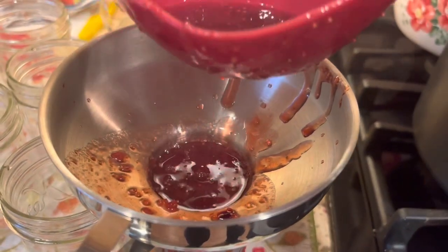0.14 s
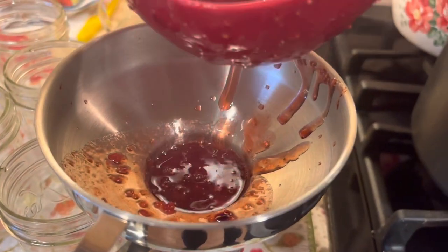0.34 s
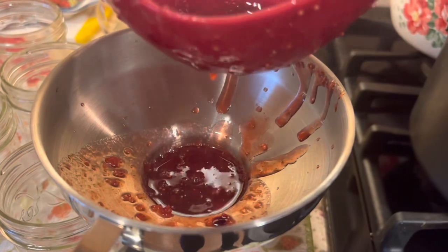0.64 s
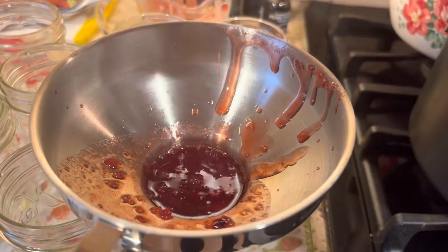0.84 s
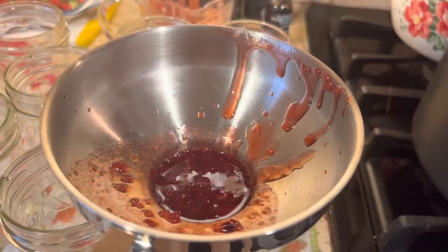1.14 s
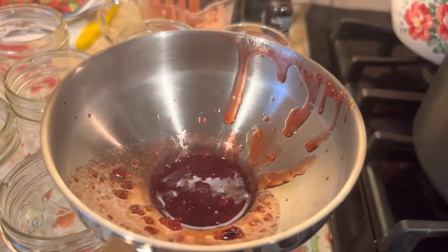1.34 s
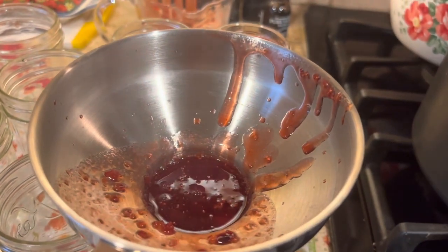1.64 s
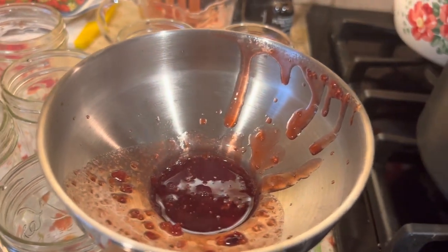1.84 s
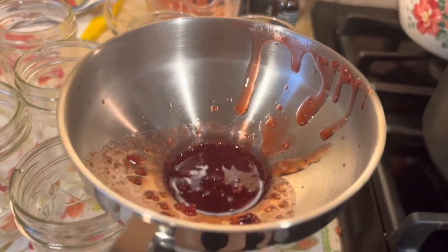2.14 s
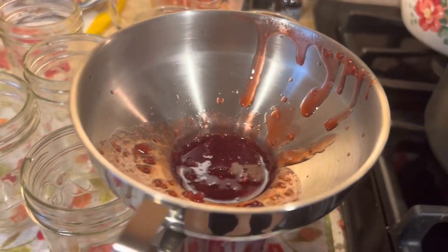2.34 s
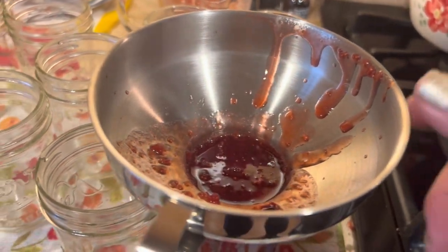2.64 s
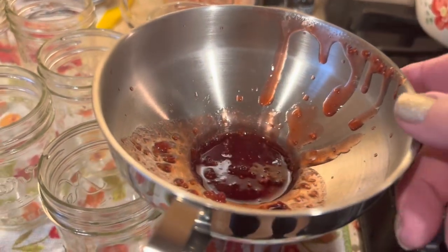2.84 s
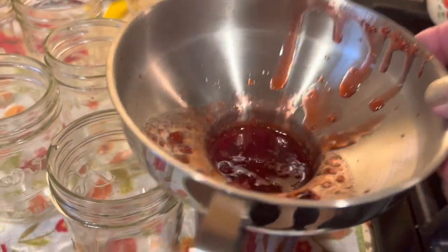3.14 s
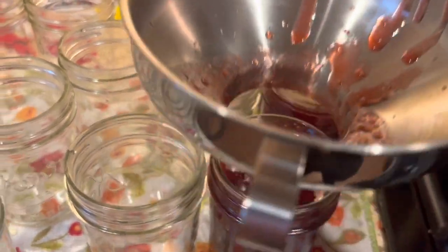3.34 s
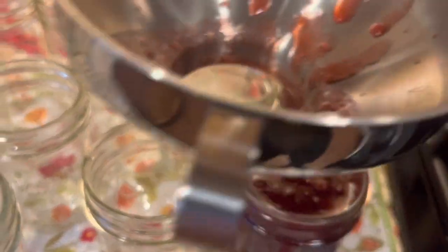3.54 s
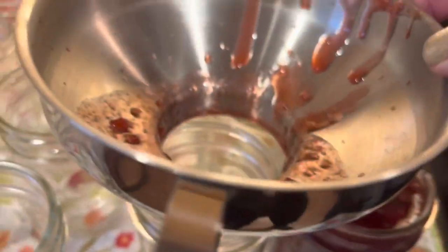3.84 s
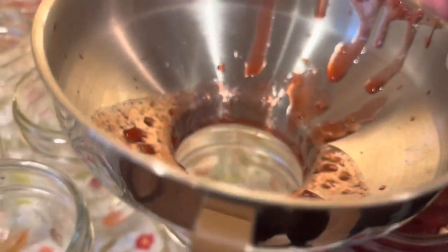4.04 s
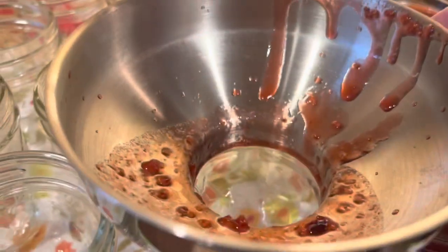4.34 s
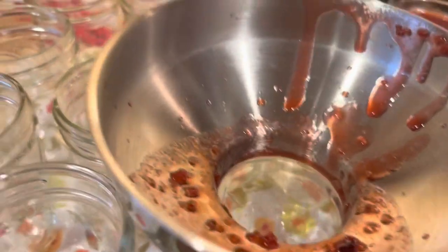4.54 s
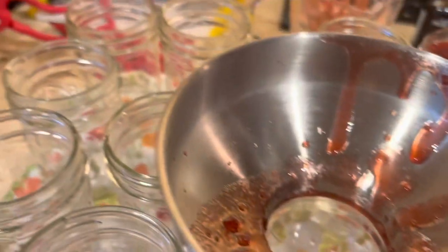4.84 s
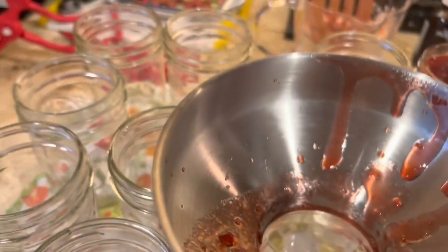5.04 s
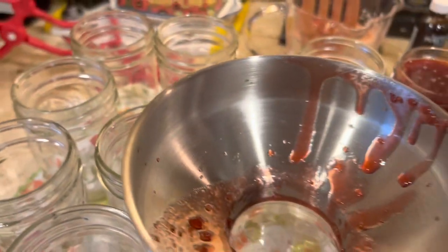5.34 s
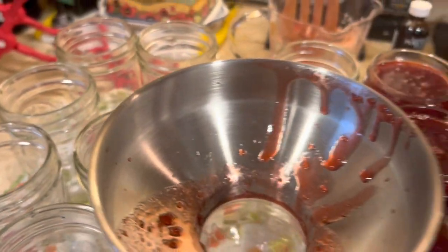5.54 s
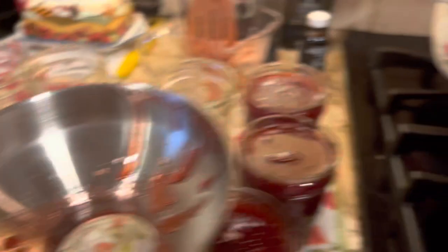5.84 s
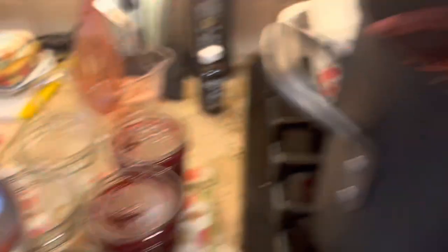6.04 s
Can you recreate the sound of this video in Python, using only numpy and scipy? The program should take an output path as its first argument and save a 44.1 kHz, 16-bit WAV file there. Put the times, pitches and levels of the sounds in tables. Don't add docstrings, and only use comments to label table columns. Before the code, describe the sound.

A steady low extractor fan rumbles with faint hiss in a small hard kitchen. A ladle is set in a pot with a cluster of hollow knocks. After a pause, a steel funnel squeaks and rattles very softly off a full jar, then hits an empty glass jar in three sharp clanks, the last loudest. Soft rubs on the counter and one small pot knock follow, heard close in stereo.

```python
import sys
import numpy as np
from scipy import signal
from scipy.fft import rfft, irfft
from scipy.io import wavfile
from scipy.ndimage import uniform_filter1d

SR = 44100
rng = np.random.default_rng(int(sys.argv[2]) if len(sys.argv) > 2 else 0)


def amplitude_ratio(level_db):
    exponent = np.asarray(level_db, float) / 20
    return 10 ** exponent


def waveform_to_disk(signal):
    frames = np.transpose(np.atleast_2d(signal))
    scaled = np.clip(frames, -1, 1) * 32767
    samples = np.round(scaled).astype(np.int16)
    wavfile.write(sys.argv[1], SR, samples)


N = 272979
SPAN = 1 << 15

# frequency [Hz], density [dB per Hz].
STEEL_CLATTER = [(71, -35.5), (120, -8.5), (598, 1), (2280, -9.5), (2750, 1), (3740, -6), (4600, -16.5),
                 (5770, -3), (6950, -14), (8530, -12), (10300, -21.5), (11900, -21), (13700, -35),
                 (15200, -17), (16500, -34.5)]
# frequency [Hz], level [dB], t60 [s].
COUNTER = [(405, 4, 0.07), (1100, 3, 0.035), (1552, -3.5, 0.053), (1890, -9.5, 0.039), (2290, -12, 0.045),
           (3040, -4, 0.047), (3570, -16, .04), (4250, -16.5, 0.033), (4790, -10, .04), (7180, -13, 0.034)]
# frequency [Hz], level [dB], t60 [s].
FUNNEL_TILTED = [(501, -7.5, 0.05), (2784, -0.5, 0.11), (3256, -1, 0.05), (3776, -9.5, 0.099),
                 (6230, -29.5, 0.18), (7394, -16, 0.1), (8770, -16.5, 0.069), (9600, -32, 0.13),
                 (11000, -32.5, 0.12), (15300, -27, 0.057)]

LIFT_S, LIFT_DB = 3.176, -54.5


def read(table, hz):
    f, v = np.transpose(table)
    return np.interp(np.log(np.maximum(hz, 1)), np.log(f), v)


def unit(x):
    return x / np.sqrt(np.mean(x ** 2))


def walk(rate_hz):
    k = int(SR / rate_hz)
    held = np.repeat(rng.standard_normal(N // k + 1), k)
    return uniform_filter1d(uniform_filter1d(held, k), k)[:N]


def ring(hz, t60_s, start_s=0):
    t = np.arange(SPAN) / SR
    decay = np.exp(-np.log(1000) * t / np.maximum(t60_s, .005))
    return np.sin(2 * np.pi * hz * (t + start_s)) * decay


def add(track, s, sound):
    i = int(s * SR)
    track[i:i + SPAN] += sound[:len(track) - i]


def causal(db):
    cep = irfft(db * np.log(10) / 20)
    cep[1:SPAN // 2] *= 2
    cep[SPAN // 2 + 1:] = 0
    return np.exp(rfft(cep))


def strikes(contacts, clatter, modes, ring_db, grit_db, longest_s, swell=0):
    out, t, hz = np.zeros(N), np.arange(SPAN) / SR, np.fft.rfftfreq(SPAN, 1 / SR)
    dry = causal(read(clatter, hz))
    body = rfft(sum(amplitude_ratio(db) * ring(f, min(t60_s, longest_s)) for f, db, t60_s in modes))
    flutter = amplitude_ratio(4.5 * walk(120)[:SPAN])
    for s, peak_db, bass_db, treble_db, length_s, share_db in contacts:
        x = t / max(length_s, 3e-4)
        envelope = x ** swell * np.exp(-x)
        noise, grit = rng.standard_normal((2, SPAN))
        burst = rfft(envelope * noise * amplitude_ratio(grit_db * grit))
        burst *= causal(read([(300, bass_db), (2500, 0.0026), (10000, treble_db)], hz))
        crack = irfft(burst * dry)
        tone = irfft(burst * body) * flutter
        sound = crack / abs(crack).max() + amplitude_ratio(ring_db + share_db) * tone / abs(tone).max()
        add(out, s, amplitude_ratio(peak_db) * sound)
    return out


def fan_air():
    # frequency [Hz], density [dB per Hz].
    rumble = [(29, -24), (41, -26), (52, -2.5), (65, -9), (114, -13), (145, -11.5), (169, -25),
              (226, -18.5), (359, -20.5), (391, -23), (699, -23.5), (775, -34), (844, -31), (3000, -57.5),
              (3900, -89), (6600, -120)]
    # frequency [Hz], density [dB per Hz].
    hiss = [(1500, -9), (3000, -2), (5000, -1), (7500, -2), (9200, -7), (10300, -18.5), (11300, -4.5),
            (12500, -8), (13500, -17), (16000, -25)]
    # frequency [Hz], likeness [-1 to 1].
    likeness = [(60, 1), (130, 0.88), (290, 0.83), (640, -0.097), (1410, 0.04), (3100, -0.024),
                (6820, 0.35), (15000, -0.19)]
    # frequency [Hz], difference [dB].
    left_right = [(60, 3.5), (110, 4), (200, 2), (700, -1), (1290, 2), (8120, 4.5), (15000, -1.5)]
    # frequency [Hz], width [Hz], level [dB].
    duct = [(56.4, 23, -53.5), (130, 56, -63.5), (304.5, 13, -70), (379, 40, -69.5), (427, 13, -71.5),
            (3300, 380, -92)]
    hz = np.fft.rfftfreq(N, 1 / SR)
    alike = np.clip(read(likeness, hz), -.99, .99)
    balance = amplitude_ratio(read(left_right, hz) / 2)

    def stereo(shape):
        mid, side = rfft(rng.standard_normal((2, N))) * np.sqrt([1 + alike, 1 - alike])
        return unit(irfft(shape * np.array([(mid + side) * balance, (mid - side) / balance]), N))

    out = amplitude_ratio(-53.5 + .8 * walk(1.9)) * stereo(amplitude_ratio(read(rumble, hz)))
    out += amplitude_ratio(-87) * stereo(amplitude_ratio(read(hiss, hz)))
    for f, width_hz, db in duct:
        out += amplitude_ratio(db + 0.89 * walk(5.3)) * stereo(1 / (1 + (2 * (hz - f) / width_hz) ** 2))
    return out


def counter_ticks():
    # start [s], peak [dB], bass [dB], treble [dB], contact length [s].
    ticks = [
        (0.783, -66, -24, 1, .002),
        (1.163, -56.5, -36, 19, .002),
        (1.871, -34.5, -12, 11, 0.0056),
        (4.696, -68, -32, 30, .004),
    ]
    contacts = [(*row, 0) for row in ticks]
    return strikes(contacts, STEEL_CLATTER, COUNTER, ring_db=-8, grit_db=2.5, longest_s=0.092)


def ladle_in_pot():
    # start [s], peak [dB], bass [dB], treble [dB], contact length [s].
    blows = [(1.552, -36.5, 14, -1, 0.018), (1.573, -44.5, -5.5, -4, 0.071),
             (1.617, -24.5, -2.5, -11.5, 0.0053), (1.623, -30.5, 1, -18, 0.0085),
             (1.667, -34.5, -27, -6, 0.0077), (1.689, -49, 1, -6, .066), (1.819, -33, 14, 1.5, 0.031),
             (1.882, -28.5, 9, 5, 0.02), (1.906, -34, 14, 0, .008), (1.93, -46, 12, 7, 0.055),
             (6.068, -37, -4, -16, 0.0073)]
    # frequency [Hz], density [dB per Hz].
    clatter = [(60, -39.5), (100, -10), (185, 0.5), (300, -5), (433, -10), (600, -10.5), (1150, -9),
               (2470, -23), (7000, -34), (9300, -47.5), (10500, -62), (16000, -83.5)]
    # frequency [Hz], level [dB], t60 [s].
    pot = [(141.5, 0, 0.3), (179.9, 7.5, 0.16), (200, -13, 0.12), (240, -5.5, .2), (310.6, -7, 0.19),
           (400, 2.5, 0.13), (445, -5, 0.16), (790, -13, .1), (1100, -13.5, 0.11), (1350, -1, 0.043),
           (1810, -17, 0.063), (2252, -51, 0.057), (7300, -44, .06)]
    contacts = [(*row, min(-2 + 0.54 * row[2], -0.5)) for row in blows]
    return strikes(contacts, clatter, pot, ring_db=-0.5, grit_db=1.5, longest_s=0.3)


def pot_notes():
    # start [s], peak [dB], frequency [Hz].
    thuds = [(1.555, -21.5, 440), (1.556, -35, 240), (1.579, -16, 180.7), (1.622, -22, 445),
             (1.622, -19, 1105), (1.63, -41, 200), (1.65, -39, 438.5), (1.683, -31.5, 180),
             (1.722, -40.5, 200), (1.819, -28, 440), (1.828, -41, 235), (1.874, -26.5, 200),
             (1.882, -23, 440), (1.883, -36, 1100), (1.905, -27, 412), (1.902, -25, 200),
             (1.907, -35.5, 1092), (4.431, -37, 400), (5.2, -42.5, 149.8), (6.069, -34, 404.8),
             (6.069, -42, 1150)]
    result = []
    for s, db, hz in thuds:
        t60_s = 0.1 * amplitude_ratio(-0.56 * (db + 26.5)) * (200 / hz) ** 0.6
        rise_s = 1.1 / hz + .0008
        result.append((s, db, hz, t60_s, rise_s))
    return result


def finger_squeak():
    # start [s], peak [dB].
    grips = [
        (2.797, -52.5),
        (2.815, -51),
        (2.834, -67),
    ]
    # frequency [Hz], density [dB per Hz].
    squeak = [(880, -57), (1500, -22), (1760, -9), (2380, -22), (2680, -7), (2970, -26), (4300, -8),
              (4660, -21), (5810, -19), (10700, -44), (11200, -13), (12000, 2), (13500, -26), (15900, -13),
              (16500, -45)]
    contacts = [(*row, -12, 1, .006, 0) for row in grips]
    return strikes(contacts, squeak, FUNNEL_TILTED, ring_db=-11.5, grit_db=10.5, longest_s=.12, swell=1.96)


def bounces(count):
    first_s, gap_s, shrink = 3.216, .030, .83
    k = np.arange(count)
    return zip(k, first_s + gap_s * (1 - shrink ** k) / (1 - shrink), -47 - 2.5 * k)


def funnel_rattle():
    # start [s], peak [dB].
    fingers = [
        (2.936, -57.5),
        (3.002, -63),
        (3.027, -57),
    ]
    # frequency [Hz], density [dB per Hz].
    clatter = [(350, -37), (700, 14.5), (1200, 6), (2200, -13), (3000, -6), (3700, 0), (4050, -28),
               (8000, -16), (16000, -46.5)]
    # frequency [Hz], level [dB], t60 [s].
    funnel = [(945, 3, 0.032), (1100, -3.5, 0.024), (1700, -9.5, 0.029), (3050, 1, 0.022), (3310, 3, 0.022),
              (3560, -9, 0.021)]
    contacts = [(s, db, 9, -15, .0035, -13) for s, db in fingers]
    contacts.append((LIFT_S, LIFT_DB, 6, 1, .0015, -1))
    for k, s, db in bounces(count=6):
        contacts.append((s, db, 2.5 - 2.5 * k, -15 if k else -10, .0011, -2.5))
    return strikes(contacts, clatter, funnel, ring_db=2, grit_db=2.0, longest_s=.15)


def rim_notes():
    # start [s], peak [dB], frequency [Hz], t60 [s].
    chinks = [(3.18, -71, 5750, .07), (3.217, -68, 7370, .1), (3.217, -74, 8700, 0.092),
              (3.555, -72, 1620, 0.53), (3.889, -58.5, 7300, .1), (3.884, -62.5, 2800, .14),
              (3.913, -27.5, 2737, 0.26), (3.912, -40, 2778, 0.38), (4.089, -47, 2780, .07),
              (4.217, -53, 6470, .094), (4.24, -49.5, 2770, .25), (4.319, -43, 650, .05),
              (4.322, -42, 2180, .055), (4.411, -44, 6860, .038), (4.712, -59, 1340, 0.25),
              (3.93, -52, 1540, .45), (4.866, -60.5, 4170, 0.15), (4.862, -68, 4600, .08),
              (5.701, -73, 2770, .17), (5.74, -64, 5160, .028)]
    rim_hz, rim_t60_s, rise_s = 2735, 0.49, .002
    result = [(s, db - 6 - k, rim_hz, rim_t60_s, rise_s) for k, s, db in bounces(count=4)]
    result.append((LIFT_S, LIFT_DB - 10.5, rim_hz, rim_t60_s, rise_s))
    return result + [(s, db, hz, t60_s, .0015 + .03 * t60_s) for s, db, hz, t60_s in chinks]


def single_notes():
    out, t = np.zeros(N), np.arange(SPAN) / SR
    mute_s, mute_step_db, mute_db_per_s = 3.376, -9, -130
    buzz_db = 9.5 * walk(500)[:SPAN]
    for s, peak_db, hz, t60_s, rise_s in pot_notes() + rim_notes():
        since_mute_s = s + t - mute_s
        held_db = mute_step_db * np.clip(since_mute_s / .008, 0, 1)
        held_db = held_db + mute_db_per_s * np.maximum(since_mute_s, 0)
        level = amplitude_ratio(peak_db + held_db * (s < mute_s) + buzz_db * (hz > 3000))
        add(out, s, level * ring(hz, t60_s, int(s * SR) / SR) * (1 - np.exp(-t / rise_s)))
    return out * amplitude_ratio(3.7 * walk(70))


def funnel_touch():
    # start [s], peak [dB], treble [dB], ring [dB].
    touches = [
        (3.900, -15.5, 3, -3.5),
        (3.906, -13, -2.5, -2.5),
        (3.910, -21.5, 1.5, 2),
        (3.925, -26, -4, -1.5),
        (4.088, -49, -6.5, -3.5),
        (4.142, -38, 7, -3.5),
        (4.150, -41, 6, -12.5),
    ]
    # frequency [Hz], level [dB], t60 [s].
    funnel = [(781, -22, .2), (2740, -11, .2), (3150, -9, .06), (5600, -12, .07), (5845, -21, .45),
              (6788, -10, .05), (7477, -2, .055), (8236, -17, .08), (8586, -24, .1), (9577, -30, .14),
              (10520, -28, .13), (10980, -32, .14), (11960, -10, .04), (12970, -26, .08), (13500, -34, .15),
              (14900, -18, .1), (15500, -20, .05)]
    contacts = [(s, db, 0.31 * (db + 16), treble_db, .004, ring_db) for s, db, treble_db, ring_db in touches]
    return strikes(contacts, STEEL_CLATTER, funnel, ring_db=-10, grit_db=0.5, longest_s=.45)


def funnel_slide():
    # start [s], peak [dB], treble [dB], contact length [s].
    slides = [
        (4.226, -20, 11.5, 0.0068),
        (4.231, -14, 2.5, 0.0044),
        (4.241, -22.5, -1.5, 0.0023),
        (4.318, -33, -8, .004),
        (4.324, -39, -8.5, 0.007),
    ]
    contacts = [(s, db, -2.2, treble_db, length_s, 0) for s, db, treble_db, length_s in slides]
    return strikes(contacts, STEEL_CLATTER, FUNNEL_TILTED, ring_db=-14.0, grit_db=5.5, longest_s=.1)


def funnel_seat():
    # start [s], peak [dB], treble [dB], ring [dB].
    seats = [
        (4.4242, -10, -13, -2.5),
        (4.4307, -9, 4.5, 6),
        (4.4343, -5, 6, -7.5),
        (4.444, -20.5, 1, -2.5),
        (4.602, -31, -25, -8),
    ]
    # frequency [Hz], density [dB per Hz].
    clatter = [(71, -41.5), (120, -9), (867, -8), (1110, -19), (1480, -8), (1820, -13.5), (3520, 2),
               (4240, -10.5), (4600, -11.5), (7540, -8.5), (10300, -21), (11900, -20.5), (13700, -35.5),
               (15500, -26), (16500, -68.5)]
    # frequency [Hz], level [dB], t60 [s].
    funnel = [(580, -18, .1), (874, -19, .1), (2180, -10, 0.13), (2453, -5, 0.074), (2677, -9, 0.11),
              (2780, -7.5, .1), (3090, -4, 0.093), (3444, -7, 0.095), (3600, -8.5, 0.0904),
              (4518, -6.5, .07), (5770, -2.5, .06), (6600, -17.5, 0.11), (7470, -7, 0.084), (7696, -4, .06),
              (8610, -12.5, .06), (9640, -18.5, 0.065), (11600, -12.5, 0.077), (11340, -11, .06),
              (11660, -10, .07), (12130, -13.5, 0.1), (15400, -18, .06)]
    contacts = [(s, db, -.6, treble_db, .004, ring_db) for s, db, treble_db, ring_db in seats]
    return strikes(contacts, clatter, funnel, ring_db=-9, grit_db=5.0, longest_s=0.11)


def counter_rubs():
    # start [s], peak [dB], bass [dB], stroke length [s].
    rubs = [(4.856, -63.5, -17, 0.0093), (5.149, -48, 18, 0.011), (5.174, -45.5, 4.5, 0.0092),
            (5.222, -56.5, 10, 0.014), (5.359, -52.5, -3.5, 0.016), (5.535, -67, 0, 0.0062),
            (5.637, -66, -5, 0.024), (5.815, -66, 1.5, 0.0057), (5.87, -65, -2, .02),
            (6.002, -59, 6, 0.0046), (6.02, -47, 2, 0.0059)]
    # frequency [Hz], density [dB per Hz].
    scrape = [(290, -30), (500, -3), (640, -11.5), (1380, -3), (1530, 2.5), (2500, -7.5), (7420, -19),
              (9630, -34), (10400, -57), (12000, -45), (16000, -59)]
    contacts = [(s, db, bass_db, 1.05 * (db + 49), length_s, 0) for s, db, bass_db, length_s in rubs]
    return strikes(contacts, scrape, COUNTER, ring_db=0, grit_db=3.0, longest_s=0.13, swell=2.33)


def room(x):
    # frequency [Hz], t60 [s].
    room_t60 = [(150, .35), (1000, 0.36), (4000, 0.31), (9000, 0.23), (14000, 0.16)]
    t, tail = np.arange(SPAN) / SR, 0
    for hz in 90 * 2 ** np.arange(8):
        band = signal.butter(2, [hz / 2 ** .5, hz * 2 ** .5], "band", fs=SR, output="sos")
        noise = signal.sosfilt(band, rng.standard_normal((2, SPAN)))
        tail = tail + noise * np.exp(-np.log(1000) * t / read(room_t60, hz))
    tail = signal.sosfilt(signal.butter(2, 11000, fs=SR, output="sos"), tail)
    tail = tail[0] + tail[1] * np.array([[1], [-1]])
    tail *= 1 - np.exp(-(t / 0.0037) ** 2)
    tail /= np.sqrt(np.sum(tail ** 2) / 2)
    return amplitude_ratio(-17) * signal.fftconvolve(x[None], tail, axes=1)[:, :N]


def ports(x):
    # frequency [Hz], difference [dB].
    balance = [(250, 1.2), (600, 3.5), (4400, 3.2), (8120, -.3), (15000, .4)]
    # frequency [Hz], phase [rad].
    phase = [(0, 0), (1200, .6), (6400, .9), (8000, 1.3), (8900, .3), (9500, -2), (15100, -12.4),
             (16400, -13.5)]
    hz = np.fft.rfftfreq(N, 1 / SR)
    half = amplitude_ratio(read(balance, hz) / 2) * np.exp(.5j * np.interp(hz, *np.transpose(phase)))
    both = np.maximum(abs(half + 1 / half) / 2, .3)
    left = irfft(rfft(x[0]) * half / both, N)
    right = irfft(rfft(x[-1]) / half / both, N)
    return np.array([left, right])


def scene():
    background = fan_air()
    near = counter_ticks()
    near += ladle_in_pot()
    near += finger_squeak()
    near += funnel_rattle()
    near += single_notes()
    near += funnel_touch()
    near += funnel_slide()
    near += funnel_seat()
    near += counter_rubs()
    return ports(near + room(near)) + background


def top_cut(x):
    return signal.sosfilt(signal.butter(12, 16830, fs=SR, output="sos"), x)


def record(dry):
    low_cut_hz, top_hz, ceiling = 44, 16300, .9
    x = signal.sosfilt(signal.butter(2, low_cut_hz, "high", fs=SR, output="sos"), dry)
    x = ceiling * np.tanh(x / ceiling)
    x = signal.sosfilt(signal.ellip(8, .3, 60, top_hz, fs=SR, output="sos"), x)
    return top_cut(x)


dry = scene()
out = record(dry)
waveform_to_disk(out)
```